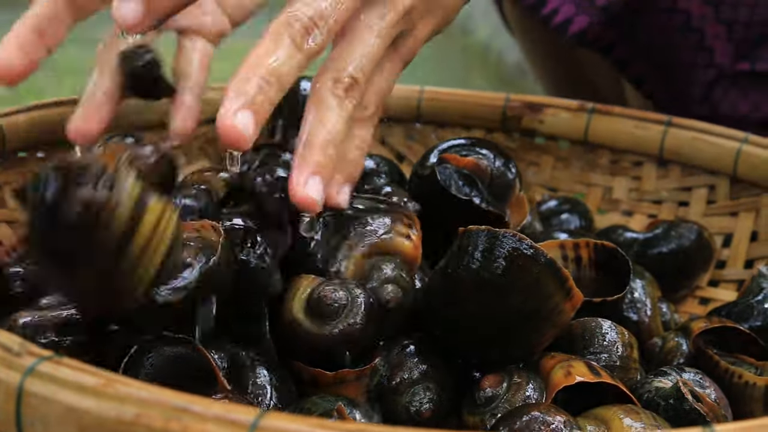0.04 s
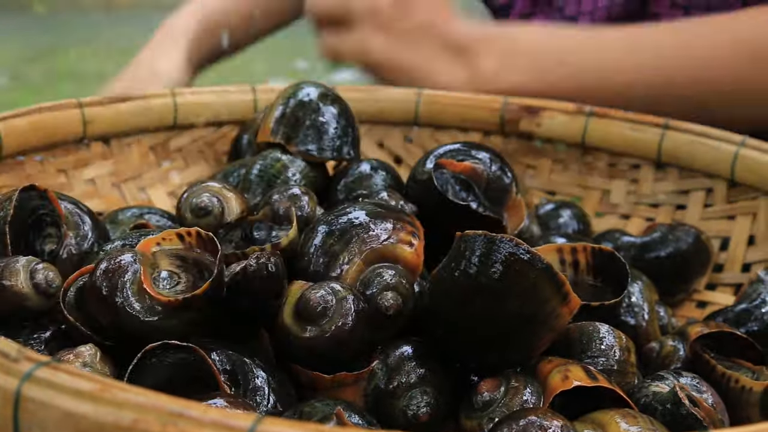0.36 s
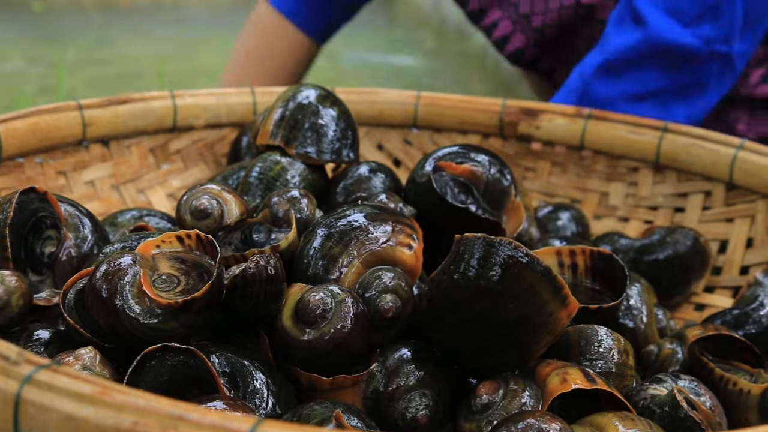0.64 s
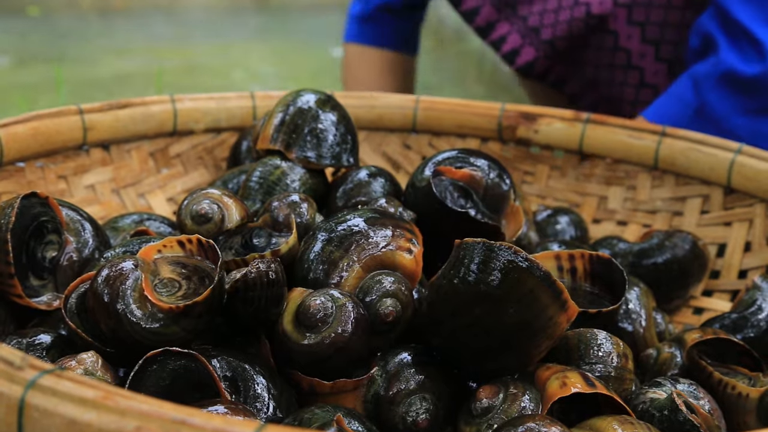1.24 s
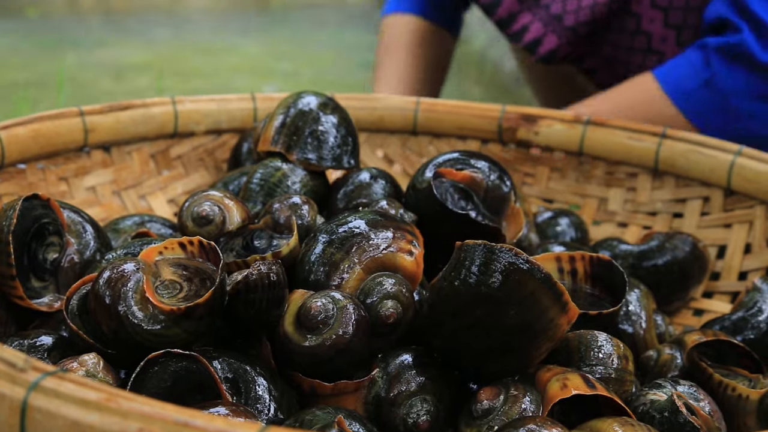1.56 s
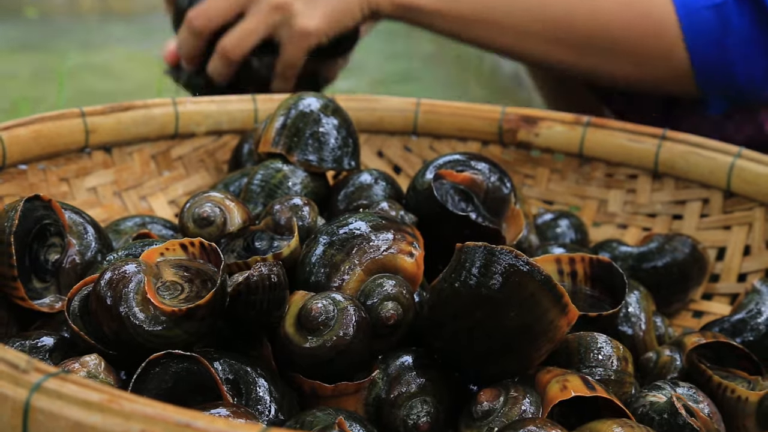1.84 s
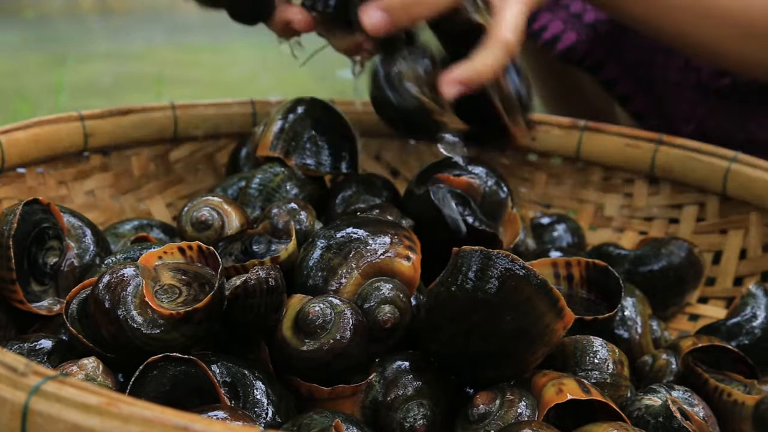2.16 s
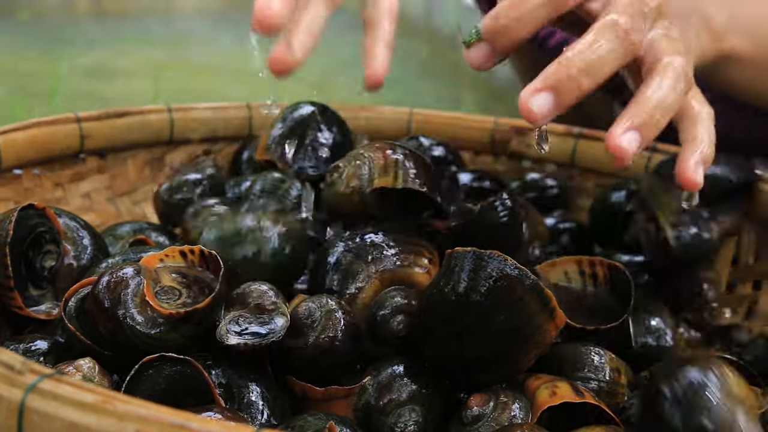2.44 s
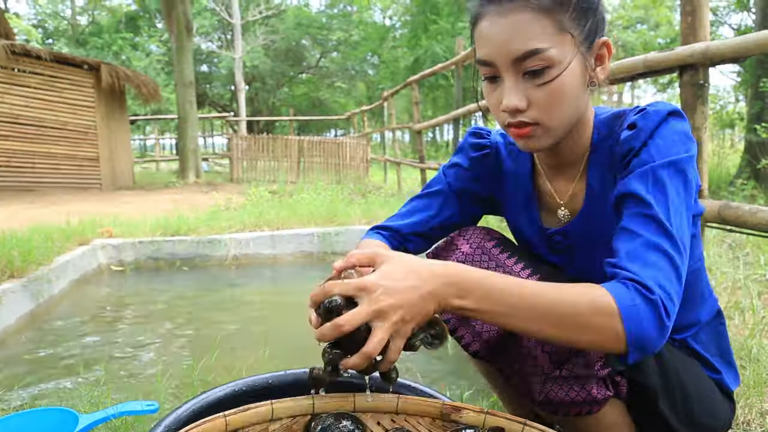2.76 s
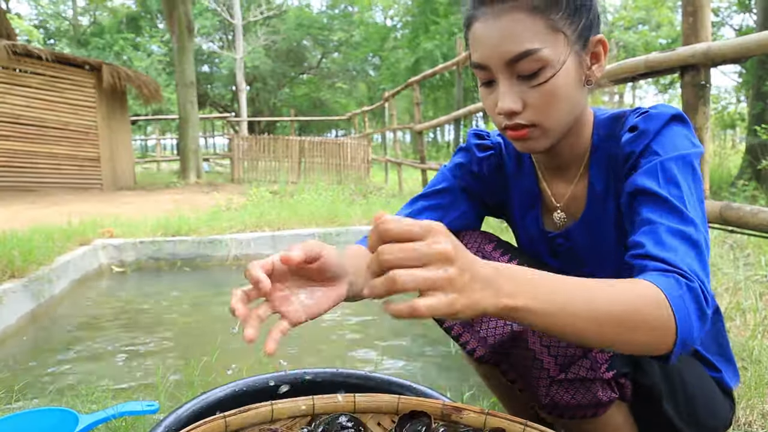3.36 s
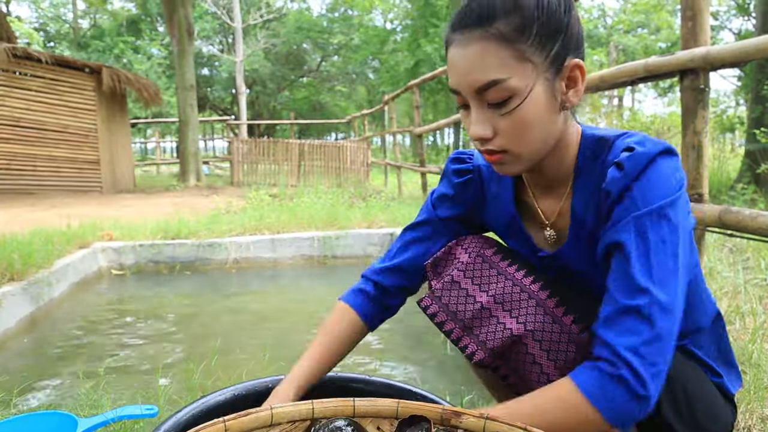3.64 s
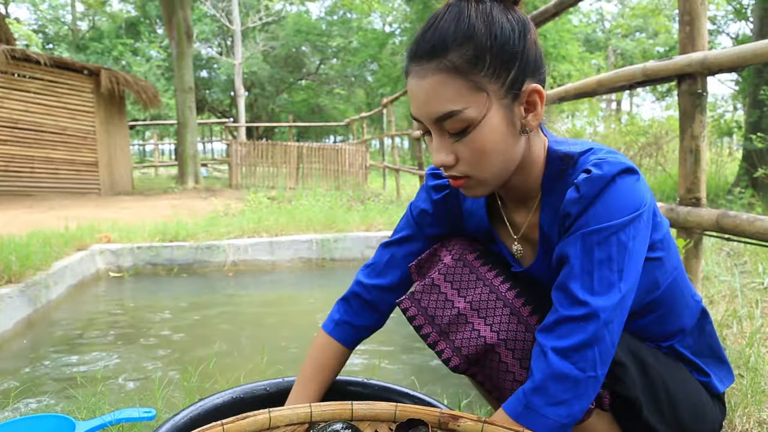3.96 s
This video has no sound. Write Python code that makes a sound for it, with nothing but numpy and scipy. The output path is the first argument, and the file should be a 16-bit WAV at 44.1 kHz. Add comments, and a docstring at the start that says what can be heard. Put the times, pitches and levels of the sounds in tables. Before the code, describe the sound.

Wet snail shells clatter onto a pile in a woven basket, close by outdoors. Hands then slosh through a tub of water, knocking sunken shells together, before two more handfuls land and settle. Insects buzz faintly far away.

```python
"""Wet snail shells drop by the handful onto a pile in a woven basket, close by and outdoors.
Each shell rings and snaps as it lands, and heavy landings make the basket thump. Between handfuls,
hands rummage in a tub of water: sunken shells knock dully, with sloshing, bubbles and spray.
Insects buzz far away. The sound cuts out briefly before the last handful, and the hardest blows
overload the recorder."""
import sys
import numpy as np
from scipy import signal
from scipy.fft import rfft, irfft, next_fast_len
from scipy.io import wavfile
from scipy.ndimage import map_coordinates

SR = 44100
rng = np.random.default_rng(int(sys.argv[2]) if len(sys.argv) > 2 else 0)


def to_wav(sig):
    """Store sig (one row per channel, or 1-D mono) as 16-bit WAV at the path in sys.argv[1].

    Samples outside -1..1 are clipped; the rate is SR.
    """
    pcm = np.clip(np.atleast_2d(sig), -1, 1) * 32767
    pcm = np.round(pcm).astype(np.int16)
    wavfile.write(sys.argv[1], SR, pcm.T)  # frames by channels


N = 176400
SIZE = 4096  # samples in one short sound


def amp(db):
    """Turn decibels into a gain."""
    return 10 ** (np.asarray(db) / 20)


def unit(x):
    """Scale a sound to an average (rms) level of 1."""
    return x / np.sqrt(np.mean(x ** 2, axis=-1, keepdims=True) + 1e-20)


def colour(points, f):
    """Gain at each frequency f, along a curve through (pitch_hz, level_db) points."""
    hz, db = np.transpose(points)
    return amp(np.interp(np.log(f + 1), np.log(hz + 1), db))


def resonance(f, hz, q):
    """A filter that rings at hz; a higher sharpness q rings longer."""
    return 1j * f * hz / q / (hz * hz - f * f + 1j * f * hz / q)


def filtered(x, response):
    """Turn each frequency of x up or down by response(frequency)."""
    size = next_fast_len(N + SIZE)
    return irfft(rfft(x, size) * response(np.fft.rfftfreq(size, 1 / SR)), size)[:N]


def noise(points):
    """Steady noise with the given tone colour."""
    return unit(filtered(rng.standard_normal(N), lambda f: colour(points, f)))


def wobble(rate):
    """A smooth curve through rate random values a second."""
    return map_coordinates(rng.standard_normal(SIZE), [np.arange(N) * rate / SR], mode="wrap")


def level(curves):
    """Gain over time from lists of (time_s, level_db), silent outside them."""
    t = np.arange(N) / SR
    return sum(amp(np.interp(t, *np.transpose(rows), left=-np.inf, right=-np.inf)) for rows in curves)


def place(times, sounds):
    """Add up short sounds, each at its start time."""
    index = np.round(np.maximum(times, 0) * SR).astype(int)[:, None] + np.arange(SIZE)
    return np.bincount(index.ravel(), sounds.ravel(), N)[:N]


# Tone colour of the air: pitch_hz, level_db
AIR_COLOUR = [(20, -16.5), (130, 5), (320, 0.5), (1000, -1.5), (2000, -12), (4000, -14), (6000, -23.5),
              (13000, -25.5), (16000, -42)]
# Insect buzzes: pitch_hz, half_width_hz, drift_fraction, level_db
INSECT_BUZZES = [(4940, 170, 0.0056, -61), (6850, 230, 0.017, -66.5)]
def outdoors():
    """Quiet air, and two thin buzzes of far insects that swell and drift in pitch."""
    air = amp(-43) * noise(AIR_COLOUR)
    for hz, width, drift, db in INSECT_BUZZES:
        rasp = unit(filtered(rng.standard_normal(N), lambda f: 1 / (1 + (f / width) ** 2)))
        pitch = hz * np.exp(drift * wobble(rate=6))
        tone = np.sin(2 * np.pi * np.cumsum(pitch) / SR)
        air = air + amp(db + 5 * wobble(rate=6)) * unit(rasp * tone)
    return air


def chirps(rows):
    """Each bubble rings briefly while its pitch rises. A fade is the time to fall by 60 dB."""
    t = np.arange(SIZE) / SR
    start, db, hz, fade, rise = np.transpose(rows)[:, :, None]
    pitch = hz * 2 ** (rise * np.minimum(t, fade))
    tone = np.sin(2 * np.pi * np.cumsum(pitch, axis=1) / SR)
    attack = 1 - np.exp(-t / 0.00019)
    return place(start[:, 0], amp(db - 60 * t / fade) * tone * attack)


def bubbling(per_s, hz, spread, cycles, rise_octaves):
    """A stream of bubbles of random size: small ones ring higher and fade sooner."""
    timing, loudness, size = rng.standard_normal((int(per_s * N / SR), 3)).T
    starts = (np.arange(len(timing)) + timing / 2) / per_s
    pitch = hz * np.exp(np.clip(spread * size, -1, 0.8))
    fade = cycles / pitch
    return unit(chirps(np.transpose([starts, 8 * np.tanh(loudness), pitch, fade, rise_octaves / fade])))


def droplets():
    """Tiny droplets tick like very small bubbles."""
    return bubbling(per_s=35, hz=5100, spread=0.4, cycles=21, rise_octaves=0.04)


# Tone colour of spray and of a shell's snap: pitch_hz, level_db
BRIGHT_COLOUR = [(2500, 3.5), (4500, 9), (6500, 7), (10000, 6.5), (13500, 2), (16000, -9)]
# Bursts of spray: start_s, level_db, attack_s, fade_s
SPRAY_BURSTS = [(0, -31.5, 0.071, 0.34), (0.622, -33, 0.011, 0.19), (1.22, -53, 0.037, 3.5),
                (2.179, -35, 0.0039, 0.16), (2.29, -52, 0.082, 1.5), (3.139, -27, .1, 0.37),
                (3.855, -32.5, 0.013, 0.24)]
def spray():
    """Fine drops crackle as hands break the surface and water runs off the shells."""
    t = np.arange(N) / SR
    swell = sum(np.clip((t - start) / attack, 0, 1) * amp(db - 60 * np.maximum(t - start - attack, 0) / fade)
                for start, db, attack, fade in SPRAY_BURSTS)
    fizz = unit(noise(BRIGHT_COLOUR) * amp(7.5 * wobble(rate=700)))
    return swell * (fizz + amp(-3.5) * droplets())


# How hard the water is stirred, one list for each spell: time_s, level_db
STIRRING_LEVELS = [
    [(.6, -39), (.64, -24), (.69, -20.5), (.76, -26), (.83, -23.5), (.88, -26), (.99, -24.5), (1.07, -30),
     (1.14, -23.5), (1.3, -22.5), (1.41, -25), (1.54, -25), (1.65, -31), (1.8, -36), (1.9, -27),
     (2.02, -36.5), (2.12, -27), (2.25, -39.5)],
    [(2.83, -38), (3.15, -47), (3.55, -64)],
    [(3.84, -40), (3.92, -32.5), (4.0, -35.5)],
]
# Single bubbles and drips: start_s, level_db, pitch_hz, fade_s, rise_octaves_per_s
SINGLE_BUBBLES = [(0.2728, -3, 3250, 0.023, 4.5), (.837, -9, 810, 0.051, 11.6),
                  (1.378, -16, 3330, 0.018, 4), (1.429, -14.5, 2530, .018, 20),
                  (1.455, -13.5, 888, 0.11, 19), (1.657, -9.5, 1516, 0.047, 7.9),
                  (1.6665, 4, 2300, 0.012, 3), (1.6667, -1.5, 1160, 0.021, 2.6),
                  (1.686, -16, 2400, 0.04, 13), (2.129, -17, 2230, 0.034, 3.2),
                  (2.3555, -7, 2970, 0.0096, 3), (2.613, -8, 3200, 0.02, 2),
                  (2.875, -14.5, 3050, 0.0082, 3.4), (3.869, -24.5, 3870, 0.081, 2.2),
                  (3.876, -20, 998, 0.087, 44)]
def bubbles():
    """Stirring makes gurgles and droplet ticks; a few bubbles stand out."""
    gurgle = bubbling(per_s=45, hz=1174, spread=0.406, cycles=39, rise_octaves=0.66)
    stirred = amp(-6.5) * gurgle + amp(-28.5) * droplets()
    return chirps(SINGLE_BUBBLES) + level(STIRRING_LEVELS) * stirred


# What surrounds a shell: muffled_above_hz, scatter_db, scatter_fade_s
PILE, TUB = (4160, -1.4, 0.052), (3600, 0.91, 0.075)
def contacts(rows, tones, space):
    """Each gritty hit rings a shell, makes a bright snap and scatters among its neighbours."""
    start, db, hz, snap_db = np.transpose(rows)[:, :, None]
    muffle_hz, scatter_db, scatter_fade = space
    t, f = np.arange(SIZE) / SR, np.fft.rfftfreq(SIZE, 1 / SR)
    hiss, chance = rng.standard_normal((2, len(rows), SIZE))

    def burst(fade_s):
        return unit(hiss * amp(-60 * t / fade_s)) / np.sqrt(SIZE)

    grit = amp(-9) * burst(fade_s=0.013)
    scatter = amp(scatter_db) * burst(scatter_fade) * (1 - np.exp(-t / 0.00051))
    push = rfft((t == 0) + grit + scatter)
    body = 0
    for k, (ratio, tone_db, q) in enumerate(tones):
        detune = np.exp(0.2 * np.log(ratio) * chance[:, k, None])  # no two shells are alike
        body = body + (-1) ** k * amp(tone_db) * resonance(f, hz * ratio * detune, q)
    muffle = signal.freqs(*signal.butter(4, 1, analog=True), f / muffle_hz)[1]
    ring = irfft(push * body * muffle)
    ring /= np.abs(ring).max(axis=1, keepdims=True)

    ping_hz = 6900 * np.exp(0.24 * chance[:, -1, None])  # one high tone, new for each hit
    ping = 1 + amp(7) * resonance(f, ping_hz, q=6)
    snap_s, delay_s = 0.0074, 0.000339
    delay = np.exp(-2j * np.pi * f * delay_s)
    snap = irfft(push * ping * colour(BRIGHT_COLOUR, f) * delay) * np.exp(-t / snap_s)
    snap = unit(snap) * np.sqrt(snap_s * SR / SIZE)
    return place(start[:, 0], amp(db) * (ring + amp(snap_db) * snap))


def jostle(tones, space, per_s, hz, snap_db, spread, vary_db):
    """Shells bump each other in an uneven stream of small hits."""
    timing, loudness, size, snap = rng.standard_normal((4, int(per_s * N / SR)))
    starts = (np.arange(len(timing)) + timing / 2) / per_s
    pitch = hz * np.exp(spread * size)
    rows = np.transpose([starts, vary_db * np.tanh(loudness), pitch, snap_db + 4 * snap])
    return unit(contacts(rows, tones, space))


# Tone colour of sloshing water: pitch_hz, level_db
SLOSH_COLOUR = [(30, -30), (180, -2), (330, -6.5), (470, 5.5), (900, 1), (2000, -13.5), (3200, -17),
                (5000, -31.5), (15000, -46)]
# Tones of a shell under water: pitch_ratio, level_db, sharpness_q
SUNKEN_TONES = [(.55, -5.5, 2.6), (1, 3.5, 7.4), (1.45, -5.5, 2.5), (2.6, -13.5, 1.63)]
# Shells knocking under water: start_s, level_db, pitch_hz
SUNKEN_KNOCKS = [(0.624, -15.5, 826), (0.679, -11.5, 620), (0.799, -10.5, 675), (0.838, -13, 900),
                 (0.847, -16, 840), (0.921, -12, 1100), (0.965, -7, 830), (1.128, -12.5, 635),
                 (1.243, -11, 900), (1.293, -7, 830), (1.318, -9, 814), (1.466, -5.5, 1280),
                 (1.508, -6.5, 1100), (1.526, -6, 1090), (1.6165, -4.5, 2560), (1.666, -2.5, 1450),
                 (1.6878, -9, 2170), (1.717, -13, 1220), (1.722, -9, 2120), (1.969, -9, 627),
                 (2.91, -17.5, 498), (3.154, -11.5, 690), (3.91, -14.5, 886)]
def tub():
    """Stirring sloshes the water and knocks shells together: dull when deep, clicking near the top."""
    dull_snap_db = -40
    knocks = contacts([(*row, dull_snap_db) for row in SUNKEN_KNOCKS], SUNKEN_TONES, TUB)
    deep = jostle(SUNKEN_TONES, TUB, per_s=170, hz=799, snap_db=dull_snap_db, spread=0.333, vary_db=4.5)
    shallow = jostle(SUNKEN_TONES, PILE, per_s=60, hz=2455, snap_db=-29, spread=0.28, vary_db=9.5)
    churn = rng.standard_normal(N) * amp(4.7 * np.tanh(wobble(rate=60)))
    slosh = unit(filtered(churn, lambda f: colour(SLOSH_COLOUR, f)))
    return knocks + level(STIRRING_LEVELS) * (amp(-3.5) * deep + amp(-14) * shallow + amp(-2.5) * slosh)


def jolts():
    """The two hardest blows add a low bump."""
    t = np.arange(SIZE) / SR
    pitch_hz, fade_s, starts_s = 72, 0.043, [1.666, 2.285]
    bump = amp(-30.5 - 60 * t / fade_s) * np.cos(2 * np.pi * pitch_hz * t)
    return place(starts_s, np.tile(bump, (2, 1)))


# Tones of the loaded basket: pitch_hz, level_db, fade_s
BASKET_TONES = [(225, 1.5, 0.029), (757, 13, 0.0097), (994, 8, 0.025), (1380, 2, 0.011)]
# Hollow thumps: start_s, level_db
BASKET_THUMPS = [(2.285, -13), (3.0552, -3.5), (3.0632, 4)]
def basket():
    """Heavy landings ring the low tones of the basket."""
    t = np.arange(SIZE) / SR
    ring = sum((-1) ** k * amp(db - 60 * t / fade) * np.sin(2 * np.pi * hz * t)
               for k, (hz, db, fade) in enumerate(BASKET_TONES))
    ring = signal.sosfilt(signal.butter(2, 190, "high", fs=SR, output="sos"), ring)
    starts, db = np.transpose(BASKET_THUMPS)
    return place(starts, amp(db)[:, None] * ring / np.abs(ring).max())


# Tones of a shell in the air: pitch_ratio, level_db, sharpness_q
SHELL_TONES = [(0.418, -5.5, 1.43), (.68, -4, 2.67), (0.997, 0.5, 8.3), (1.352, -4.5, 5.8),
               (2.1, -8.5, 6.7)]
# How much the pile moves, one list for each handful: time_s, level_db
SETTLING_LEVELS = [
    [(0, -28.5), (.06, -23.5), (.15, -30), (.26, -27), (.31, -57.5), (.6, -42.5)],
    [(2.24, -36.5), (2.295, -26), (2.44, -29.5), (2.56, -27.5), (2.64, -35), (2.75, -35)],
    [(2.83, -43), (2.95, -51), (3.0, -31), (3.09, -33), (3.24, -21.5), (3.36, -31.5), (3.52, -41.5)],
]
# Shell landing on shell: start_s, level_db, pitch_hz, snap_db (compared with the ring)
SHELL_CLACKS = [(0.0087, -14, 2950, -14), (0.0192, -5, 2210, -25), (0.0312, -18, 3000, -18),
                (0.0543, -9, 2630, -23), (0.0612, -7, 2580, -20), (0.0695, -7.5, 2620, -22),
                (0.0927, -11.5, 2700, -25.5), (0.1261, -6, 3400, -29.5), (0.17, -6, 2740, -24.5),
                (0.1906, -13, 2800, -44), (0.2129, -13, 1520, -29), (0.2316, -20, 1590, -14),
                (0.2584, -8, 3560, -28), (0.2885, -13.5, 4150, -20), (0.3005, -10, 3270, -29),
                (0.3618, -20, 3340, -28.5), (0.4199, -22.5, 2560, -31), (0.4495, -21.5, 2250, -24.5),
                (0.5135, -17, 2330, -35), (2.1836, -6.5, 1990, -30.5), (2.2848, -1, 1520, -10.5),
                (2.3186, -5.5, 1780, -32), (2.3294, -4, 2370, -29), (2.3405, -13, 3000, -22),
                (2.3797, -2, 2880, -30), (2.3832, -2.5, 3020, -33), (2.4062, -5, 1720, -23.5),
                (2.4413, -3.5, 3530, -26), (2.4516, -3.5, 3300, -25), (2.4781, -3, 3060, -36.5),
                (2.5075, -3.5, 2810, -19), (2.5165, -12, 2740, -17.5), (2.5557, -12, 2900, -20),
                (2.5775, -10, 3340, -29), (2.593, -16, 3070, -33), (2.612, -6.5, 3000, -22.5),
                (2.83, -11, 2320, -33), (2.875, -11.5, 3080, -23.5), (2.9306, -16, 2040, -10.5),
                (2.9598, -7.5, 3200, -15.5), (2.9766, -2.5, 2690, -17.5), (2.9874, -5.5, 3830, -21.5),
                (3.1009, -9.5, 2390, -20), (3.1305, -9, 3000, -14.5), (3.1909, -12.5, 2280, -16.5),
                (3.22, -2, 1740, -24.5), (3.2475, -8, 3840, -15.5), (3.2564, -6.5, 1780, -23),
                (3.2882, -9.5, 1600, -29), (3.3064, -12, 1700, -23), (3.3461, -9.5, 2300, -20.5),
                (3.3727, -16, 1760, -23), (3.4465, -16.5, 1700, -20.5), (3.468, -20, 1380, -19),
                (3.647, -20.5, 1350, -21), (3.6791, -19, 1620, -26), (3.718, -13.5, 1720, -19),
                (3.7648, -16.5, 1500, -22), (3.7765, -7.5, 2340, -30.5), (3.7934, -13.5, 1600, -31),
                (3.8704, -15.5, 3890, -20)]
def shells():
    """Shells land on the pile, then roll and settle; air pockets ring in the water between them."""
    clacks = contacts(SHELL_CLACKS, SHELL_TONES, PILE)
    rolling = jostle(SHELL_TONES, PILE, per_s=190, hz=2400, snap_db=-26.5, spread=0.34, vary_db=6)
    squelch = bubbling(per_s=190, hz=3200, spread=0.18, cycles=34, rise_octaves=0.05)
    return clacks + level(SETTLING_LEVELS) * (amp(1.5) * rolling + amp(-10) * squelch)


def scene():
    """All the sources together in one channel."""
    return (outdoors() + spray() + bubbles() + tub() + jolts() + basket() + shells())[None]


def record(dry):
    """The sound cuts out briefly, the loudest peaks clip and the highest treble is removed."""
    t = np.arange(N) / SR
    sound_on = (t < 2.7505) | (t > 2.829)
    clipped = np.clip(dry[0] * sound_on, -1, 1)
    return filtered(clipped, lambda hz: hz < 16000)[None]


dry = scene()
out = record(dry)
to_wav(out)
```